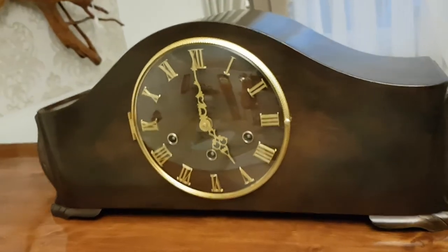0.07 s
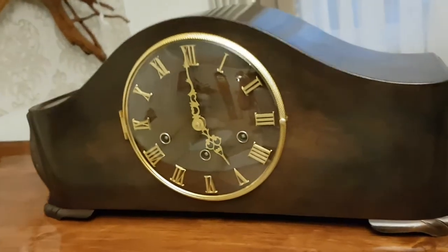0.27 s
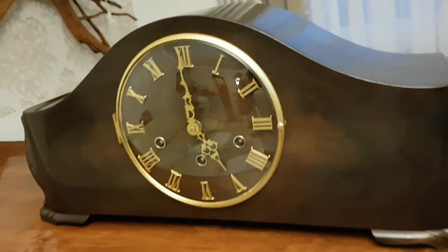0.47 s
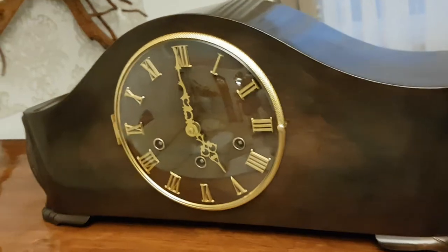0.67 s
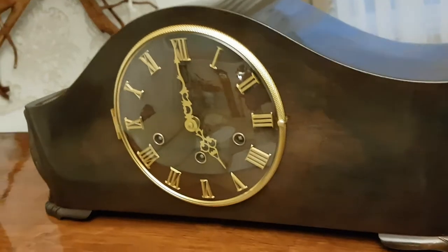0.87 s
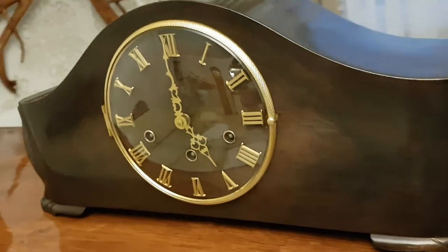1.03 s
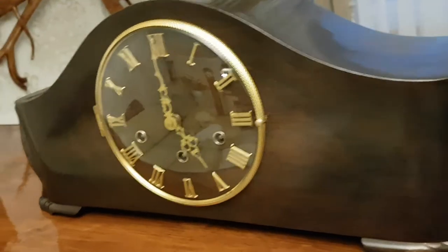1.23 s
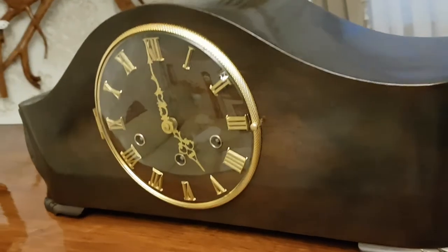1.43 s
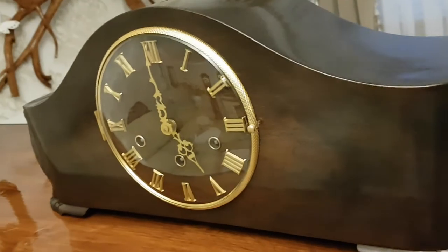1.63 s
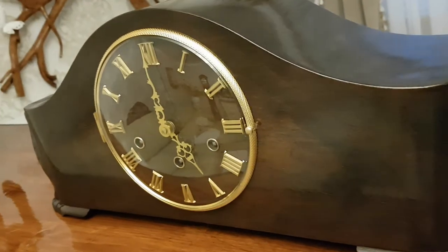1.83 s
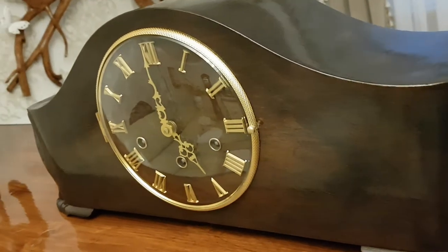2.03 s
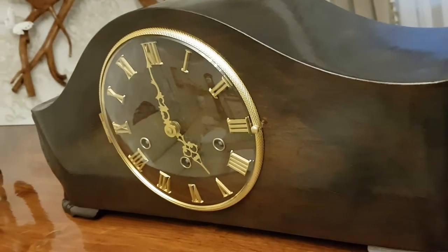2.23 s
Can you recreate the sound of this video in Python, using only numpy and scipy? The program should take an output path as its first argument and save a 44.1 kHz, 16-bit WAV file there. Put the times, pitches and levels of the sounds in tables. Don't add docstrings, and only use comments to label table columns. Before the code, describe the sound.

A wooden mantel clock ticks and tocks softly indoors, with a loud double knock early on

```python
import sys
import numpy as np
from scipy import signal
from scipy.fft import rfft, irfft, next_fast_len
from scipy.io import wavfile
from scipy.ndimage import uniform_filter1d, map_coordinates

SR = 44100
rng = np.random.default_rng(int(sys.argv[2]) if len(sys.argv) > 2 else 0)


def how_loud(loudness_db):
    steps = np.asarray(loudness_db, float) / 20
    return 10 ** steps


def master(y):
    cut = np.clip(np.atleast_2d(y).T, -1, 1)
    pcm = np.round(cut * 32767)
    wavfile.write(sys.argv[1], SR, pcm.astype(np.int16))


N = 101429


def unit(x):
    return x / np.sqrt(np.mean(x ** 2) + 1e-20)


def along(points, hz):
    f, v = np.transpose(points)
    return np.interp(np.log(hz + 1), np.log(f + 1), v)


def filtered(x, response):
    n = x.shape[-1]
    m = next_fast_len(n + 8192)
    return irfft(rfft(x, m) * response(np.fft.rfftfreq(m, 1 / SR)), m)[..., :n]


def add(out, start_s, x):
    i = max(round(start_s * SR), 0)
    out[:, i:i + x.shape[-1]] += x[:, :max(N - i, 0)]


def room_tail():
    # pitch_hz, t60_s
    room_decay = [(300, 0.498), (1500, 0.393), (4000, 0.272), (8000, 0.198)]
    hz, t, z = signal.stft(rng.standard_normal((2, SR // 2)), SR, nperseg=256)
    decay = how_loud(-60 * t / along(room_decay, hz)[:, None])
    h = signal.istft(z * decay, SR, nperseg=256)[1]
    return np.pad(h / np.linalg.norm(h[0]), ((0, 0), (200, 0)))


def rattle_case(rows, case, rise_s, hold_s, t60_s, blow_db, gain_db, room_db, tilt_db):
    out, t = np.zeros((2, N)), np.arange(SR // 4) / SR

    def ring(f):
        modes = 0
        for k, (centre_hz, width_hz, db) in enumerate(case):
            damping = 1j * f * width_hz
            modes = modes + (-1) ** k * how_loud(db) * damping / (centre_hz ** 2 - f * f + damping)
        port_tilt = how_loud(np.outer([-tilt_db, tilt_db], np.log2((f + 50) / 1500)))
        return modes * port_tilt / (1 + 1j * f / 7520) ** 2

    fade_db = -60 * np.maximum(t - hold_s, 0) / t60_s - 5.2 * np.minimum(t / hold_s, 1)
    envelope = (1 - np.exp(-t / rise_s)) * how_loud(fade_db)
    for start_s, level_db, *_ in rows:
        noise = rng.standard_normal((3, len(t)))
        grit = how_loud(3.43 * rng.standard_normal(len(t)))
        rattle = (noise[:-1] + 0.645 * noise[-1]) * grit * envelope
        first_blow = how_loud(blow_db - 60 * t / 0.00374) * noise[-1]
        x = filtered(rattle + first_blow, ring)
        x = x * how_loud(level_db + gain_db - 6) / np.sqrt(np.mean(x[:, :SR // 50] ** 2))
        add(out, start_s, x)
        add(out, start_s, how_loud(room_db) * signal.fftconvolve(x, room_tail(), axes=1))
    return out


def escapement(rows, modes, contacts):
    out, t = np.zeros((2, N)), np.arange(SR // 6) / SR
    lead_s = .005
    hz, mode_db, t60_s = np.transpose(modes)[..., None]
    for start_s, level_db, late_db, bright_db in rows:
        x = np.zeros((2, SR // 4))
        for delay_ms, contact_db, tilt_db in contacts:
            size_db = level_db + contact_db + late_db * (delay_ms > 5) + mode_db
            size_db = size_db + (tilt_db + bright_db) * np.log2(hz / 1500)
            size_db = size_db + 2.2 * rng.standard_normal((2, len(modes), 1))
            phase = 2 * np.pi * rng.random(hz.shape) + 0.712 * rng.standard_normal(size_db.shape)
            pitch_hz = hz * (1 + .012 * rng.standard_normal(hz.shape))
            ring = how_loud(size_db - 60 * t / t60_s) * np.sin(2 * np.pi * pitch_hz * t + phase)
            ring = ring.sum(axis=1) * (1 - np.exp(-t / .0009))
            first = round((delay_ms + 1000 * lead_s) * SR / 1000)
            x[:, first:][:, :len(t)] += ring
        add(out, start_s - lead_s, x)
        add(out, start_s - lead_s, how_loud(-6) * signal.fftconvolve(x, room_tail(), axes=1))
    return out


def room_tone():
    # pitch_hz, level_db (per Hz)
    hiss_colour = [(25, -14.5), (60, -3), (250, -8), (700, -14), (2200, -19.5), (5000, -29), (9500, -34),
                   (15800, -26.5)]
    # pitch_hz, level_db (per Hz)
    rumble_colour = [(28, -19), (48, 1.5), (80, 0), (150, -4.5), (350, -13.5), (800, -41)]
    # time_s, level_db
    grip_level = [(0, -67.5), (.29, -70), (.42, -79.5), (.6, -74), (.69, -63), (.78, -74), (1.12, -82),
                  (1.25, -63), (1.5, -71), (1.6, -74.5), (1.72, -68), (1.92, -69), (2.0, -77.5),
                  (2.15, -70), (2.3, -68.5)]
    z = signal.stft(rng.standard_normal((2, N + 512)), nperseg=512)[2]
    patches = uniform_filter1d(rng.standard_normal(z.shape), 6, 1)
    patches = uniform_filter1d(patches, 10, 2)
    hiss = signal.istft(z * how_loud(1.32 * unit(patches)), nperseg=512)[1][:, :N]
    hiss = unit(filtered(hiss, lambda f: how_loud(along(hiss_colour, f)) * (f < 15830)))
    lump_steps = np.arange(N) * 30 / SR
    lumps = np.array([map_coordinates(k, [lump_steps]) for k in rng.standard_normal((2, 80))])
    rumble = filtered(rng.standard_normal((2, N)), lambda f: how_loud(along(rumble_colour, f)))
    rumble = unit(how_loud(3.5 * lumps) * rumble)
    grip = how_loud(np.interp(np.arange(N) / SR, *np.transpose(grip_level)))
    return how_loud(-69.5 + 3) * hiss + grip * rumble


def far_chirps():
    # start_s, length_s, pitch_hz, level_db
    chirp_rows = [
        (0.399, 0.0337, 7200, -78),
        (1.6, 0.082, 7300, -79),
    ]
    out, t = np.zeros((2, N)), np.arange(SR // 10) / SR
    for start_s, length_s, pitch_hz, level_db in chirp_rows:
        fuzz = unit(uniform_filter1d(rng.standard_normal((2, len(t))), size=150))
        swell = np.sin(np.pi * np.clip(t / length_s, 0, 1))
        add(out, start_s, how_loud(level_db) * fuzz * swell * np.sin(2 * np.pi * pitch_hz * t))
    return out


def case_snaps():
    # start_s, left_db, right_db, pitch_hz
    snap_rows = [(.028, -67, -52, 6500), (.322, -62.5, -55, 5500), (1.366, -61, -48, 10000),
                 (1.413, -69.5, -60, 5500), (1.29, -70, -59, 6000), (2.227, -57, -42, 8500),
                 (2.298, -66, -57, 7000)]
    out, t = np.zeros((2, N)), np.arange(SR // 10) / SR
    for start_s, left_db, right_db, pitch_hz in snap_rows:
        ping = how_loud(-60 * t / 0.00081) * np.sin(2 * np.pi * pitch_hz * t)
        add(out, start_s, how_loud([[left_db], [right_db]]) * ping)
    return out


def cloth_rustle():
    # start_s, level_db
    rustle_rows = [(.02, -66.5), (.625, -64.5), (.671, -59.5), (.8, -65), (1.19, -66), (1.53, -64)]
    # pitch_hz, width_hz, level_db
    cloth_colour = [(1960, 1780, 0), (3930, 1240, -2), (7000, 5960, -9)]
    return rattle_case(rustle_rows, cloth_colour, rise_s=.006, hold_s=.035, t60_s=.18,
                       blow_db=-15, gain_db=.1, room_db=-9.5, tilt_db=-0.05)


def table_click():
    # start_s, level_db
    click_rows = [
        (.7848, -50.5),
    ]
    # pitch_hz, width_hz, level_db
    table_colour = [(500, 588, 3), (1300, 1004, .3), (2745, 2000, -7)]
    return rattle_case(click_rows, table_colour, rise_s=.0008, hold_s=0.011, t60_s=0.07,
                       blow_db=5, gain_db=-3.5, room_db=-4.5, tilt_db=0.27)


def finger_thumps():
    # peak_s, peak_db, width_ms, direction
    left_thumps = [(0.0305, -55.5, 2.12, 1), (0.0745, -55.5, 1.47, 1), (0.0923, -55, 2.24, -1),
                   (0.1781, -55, 1.43, -1), (0.7441, -46, 2.05, -1), (0.766, -54, 1.21, -1),
                   (0.7863, -51.5, 0.625, 1), (0.8028, -55, 2, -1), (0.8329, -55, 1.28, -1),
                   (0.9164, -56.5, 1.33, -1), (1.1662, -41, 1.174, 1), (1.1951, -54, 1.53, 1),
                   (1.2211, -56.5, 2.53, -1), (1.24, -50, 2.58, -1), (1.4782, -53, 3.84, -1),
                   (1.553, -51.5, 1.02, -1), (1.6218, -46, 0.96, 1), (1.7012, -49.5, 1.81, 1),
                   (1.7646, -56.5, 1.77, 1), (1.7759, -53.5, 3.37, 1), (1.9125, -41.5, 1.09, 1),
                   (1.9207, -50, 2.2, 1), (2.1245, -52, 3.37, -1)]
    # peak_s, peak_db, width_ms, direction
    right_thumps = [(0.0037, -52, 2.3, 1), (0.03, -45.5, 1.276, 1), (0.0456, -53.5, 2.62, -1),
                    (0.0732, -54, 2.49, -1), (0.1017, -49.5, 1.91, -1), (0.1277, -52, 2.32, -1),
                    (0.158, -51, 3.5, -1), (0.1725, -54.5, 2.26, -1), (0.2998, -52.5, 0.95, 1),
                    (0.6605, -45, 1.965, -1), (0.6742, -53.5, 1.7, -1), (0.6934, -49.5, 1.69, -1),
                    (0.7964, -50, 1.53, -1), (0.9385, -52, 1.85, -1), (1.2144, -46, 1.135, 1),
                    (1.226, -53, 1.55, -1), (1.237, -45, 1.62, -1), (1.2675, -55, 1.57, -1),
                    (1.3173, -52.5, 1.64, -1), (1.3415, -52, 2.6, -1), (1.6748, -51, 3.12, -1),
                    (2.0085, -51, 0.93, 1), (2.1136, -44.5, 2.49, -1), (2.1261, -48.5, 1.3, -1),
                    (2.1425, -53.5, 3.24, -1), (2.1867, -52, 2.54, -1),
                    (1.6, -56, 3.37, -1), (1.82, -52.5, 4.14, -1), (2.282, -52, 2.57, -1),
                      (1.1, -52.5, 3.73, -1)]
    out, t = np.zeros((2, N)), np.arange(-400, 1200) / SR
    leak_db = -17
    left_side = (left_thumps, [[0], [leak_db]])
    right_side = (right_thumps, [[leak_db], [0]])
    for rows, port_db in (left_side, right_side):
        for peak_s, peak_db, width_ms, direction in rows:
            u = 1000 * t / width_ms
            slowing = np.where(u < 0, 1, 0.761)
            hump = np.exp(-(u / np.where(u < 0, 0.725, 1.813)) ** 2 / 2)
            swing = np.cos(2 * np.pi * abs(u) ** slowing / 3.1) * hump
            add(out, peak_s + t[0], np.sign(direction) * how_loud(peak_db) * how_loud(port_db) * swing)
    return out


def knocks():
    # peak_s, spike_db, spike_width_ms, body_db, body_pitch_ratio
    knock_rows = [
        (0.2024, -7.6, .215, 0.16, 1.011),
        (0.2492, -25, 0.297, -8.5, 0.971),
        (0.7851, -48, .25, -45, 1.53),
    ]
    # pitch_hz, level_db, t60_s
    body_modes = [(250.1, 2, 0.00759), (108.3, -19, 0.039), (441, -6, .0094)]
    right_port_db = [-21, -22.5, -0.5]
    lag_s = 0.000264
    out, t = np.zeros((2, N)), np.arange(-100, SR // 10) / SR
    for (peak_s, spike_db, width_ms, body_db, ratio), right_db in zip(knock_rows, right_port_db):
        u = np.maximum(t - [[0], [lag_s]], 0)
        lopsided = np.where(t > 0, .6, 1.6)
        spike = -how_loud(spike_db) * np.exp(-4 * np.log(2) * abs(1000 * t / width_ms) ** 1.83 * lopsided)
        crack = np.diff(rng.standard_normal(len(t) + 1))
        spike = spike + how_loud(spike_db - 39.5 - 60 * abs(t) / 0.0037) * crack
        body = 0
        for k, (hz, db, t60_s) in enumerate(body_modes):
            swing = np.sin(2 * np.pi * hz * ratio * u)
            body = body + (-1) ** k * how_loud(body_db + db - 60 * u / t60_s) * swing
        body = body * (1 - np.exp(-u / 0.002026))
        knock = body * how_loud([[0], [right_db]]) + spike * how_loud([[0], [right_db - 23.5]])
        add(out, peak_s + t[0], knock)
    return out


def far_clockwork():
    # start_s, level_db
    far_rows = [
        (.001, -62),
        (.352, -64),
        (.676, -65),
        (1.34, -57.5),
        (1.63, -65),
    ]
    # pitch_hz, width_hz, level_db
    far_case = [(639, 63.4, -9), (806.3, 57, -8), (1344.6, 40, 4), (1703.5, 40, -8), (2025.6, 89.4, -8),
                (2307, 90, -2.5), (2747, 65, -14), (3790, 543, -22)]
    # start_s, level_db, later_contacts_db, brightness_db_per_octave
    ping_rows = [
        (.344, -61, -2.5, .1),
    ]
    # pitch_hz, level_db, t60_s
    ping_modes = [(2248, 0, .04), (2453, -3.5, .04), (2784, -8, .03)]
    # delay_ms, level_db, brightness_db_per_octave
    ping_contacts = [
        (.1, 0.64, .1),
        (9, -4.5, .1),
    ]
    rattle = rattle_case(far_rows, far_case, rise_s=.012, hold_s=.05, t60_s=0.13,
                         blow_db=-15, gain_db=-2, room_db=-4.5, tilt_db=1.5)
    return rattle + escapement(ping_rows, ping_modes, ping_contacts)


def tocks():
    # start_s, level_db, later_contacts_db, brightness_db_per_octave
    tock_rows = [
        (.6148, -54, 4, .2),
        (1.248, -51.5, 1.5, 1.2),
        (1.8818, -51, -2.5, 1.8),
    ]
    # pitch_hz, width_hz, level_db
    tock_case = [(790, 173, -7.5), (1166, 335, 0.5), (2165, 620, -7.5), (3270, 900, -7.5),
                 (4740, 1500, -17.5)]
    # pitch_hz, level_db, t60_s
    tock_modes = [(791, -9, .04), (1097.4, .3, .032), (1235.7, -1.5, .03), (1649.5, -9, .025),
                  (2027, -9, .028), (2372, -10, .028), (2948, -12, .03), (3564, -9, .022),
                  (3800, -12, .018), (4550, -19, .015), (5035, -24, .015)]
    # delay_ms, level_db, brightness_db_per_octave
    tock_contacts = [
        (-1, -17, 8),
        (1.15, -6, 5),
        (3, 0.16, -3),
        (8.5, -4, -1),
        (18, -11.5, 1.35),
    ]
    rattle = rattle_case(tock_rows, tock_case, rise_s=0.35, hold_s=.01, t60_s=0.0556,
                         blow_db=-12.5, gain_db=-8.5, room_db=-6.5, tilt_db=4)
    return rattle + escapement(tock_rows, tock_modes, tock_contacts)


def ticks():
    # start_s, level_db, later_contacts_db, brightness_db_per_octave
    tick_rows = [
        (.2535, -52, 2.5, 1.2),
        (.887, -51, -.3, -.3),
        (1.521, -51.5, .6, 1.2),
        (2.154, -51, -5, 1.3),
    ]
    # pitch_hz, width_hz, level_db
    tick_case = [(789, 150, -6), (1121, 120, 0.5), (1550, 350, -5), (2247, 350, -2.5), (3220, 400, -11),
                 (5500, 3000, -17.5)]
    # pitch_hz, level_db, t60_s
    tick_modes = [(780.7, -6.5, .065), (1096.1, -3, .06), (1278.7, -7, .05), (1556.4, -5.5, .06),
                  (1703, -9, .04), (1988, -8, .035), (2172.8, -3, .03), (2286.2, -.5, .03),
                  (3169.8, -7, .032), (3487, -12, .025), (4144, -23, .015)]
    # delay_ms, level_db, brightness_db_per_octave
    tick_contacts = [
        (-1.12, -13.5, 2),
        (0.62, -0.08, .5),
        (7.5, -7.5, -1),
        (13, -7, -0.1),
        (22, -11.5, -2),
    ]
    rattle = rattle_case(tick_rows, tick_case, rise_s=.003, hold_s=.014, t60_s=.085,
                         blow_db=-9, gain_db=-8.5, room_db=-6.5, tilt_db=2.2)
    return rattle + escapement(tick_rows, tick_modes, tick_contacts)


def scene():
    background = room_tone() + far_chirps() + far_clockwork()
    handling = case_snaps() + cloth_rustle() + finger_thumps() + knocks()
    return background + handling + table_click() + tocks() + ticks()


def roll_off(x):
    return signal.sosfilt(signal.butter(12, 16500, fs=SR, output="sos"), x)


def record(dry):
    mix = filtered(dry, lambda f: (1j * f / (18 + 1j * f)) ** 2)
    return roll_off(mix)


dry = scene()
out = record(dry)
master(out)
```